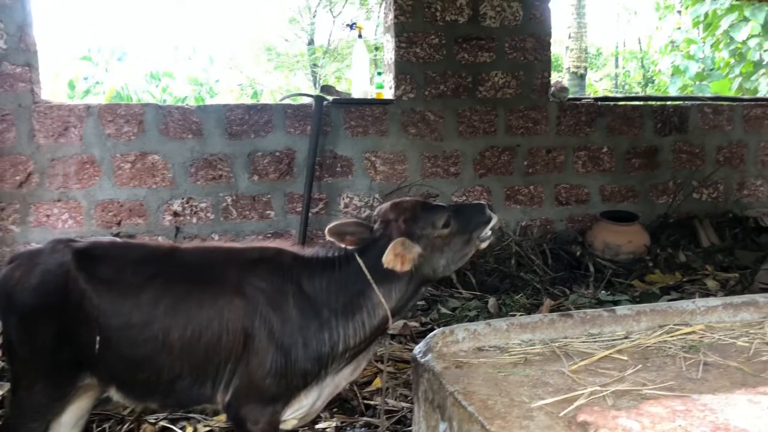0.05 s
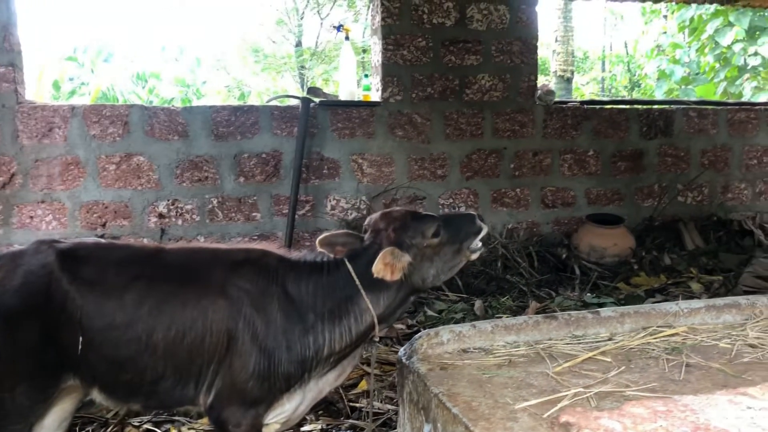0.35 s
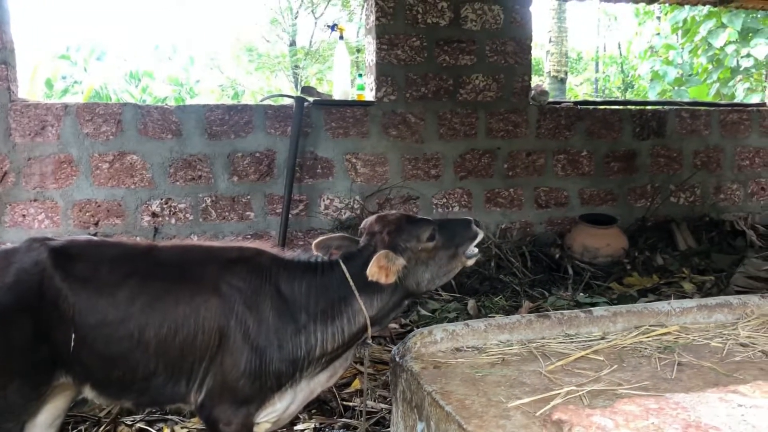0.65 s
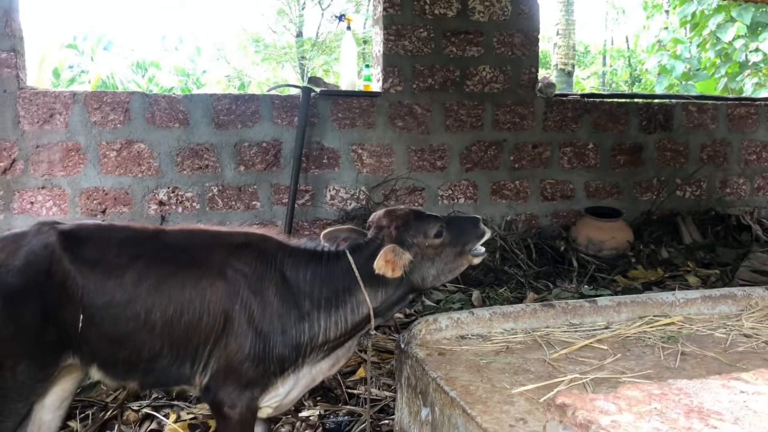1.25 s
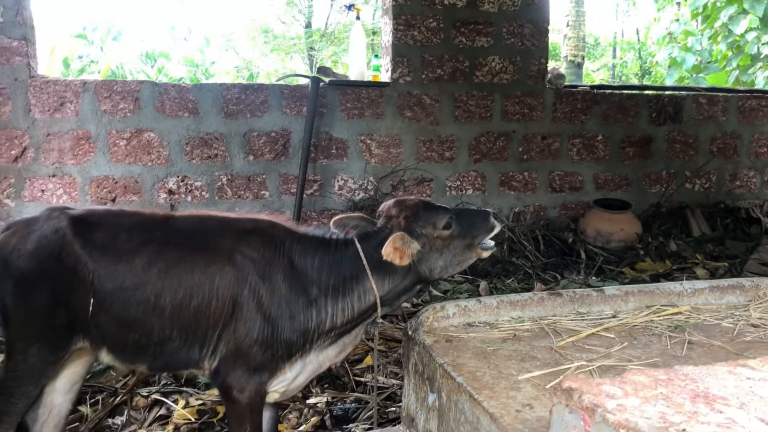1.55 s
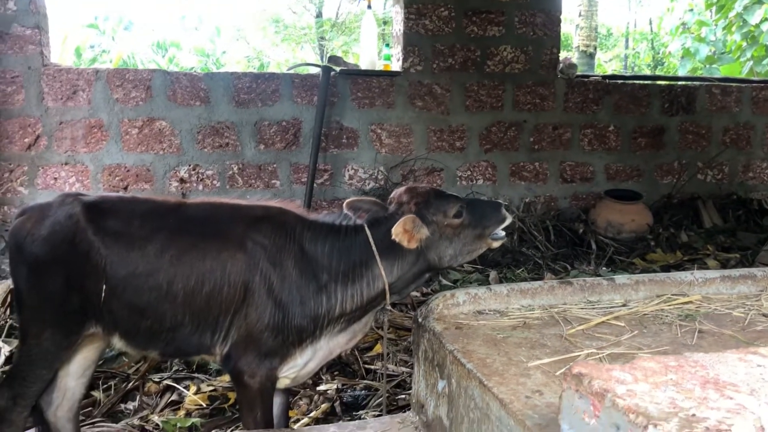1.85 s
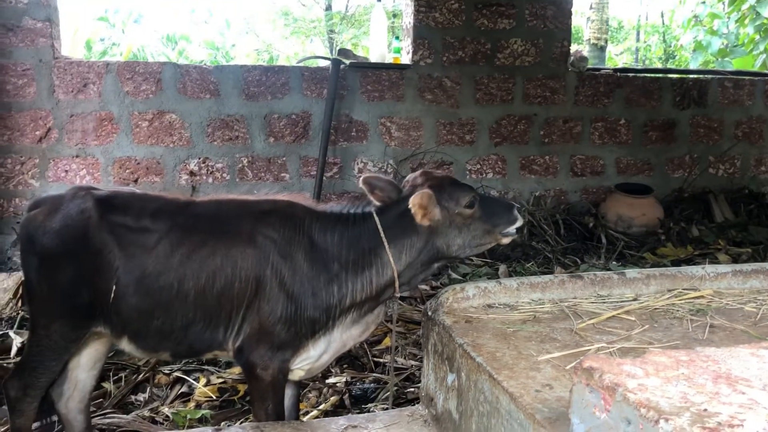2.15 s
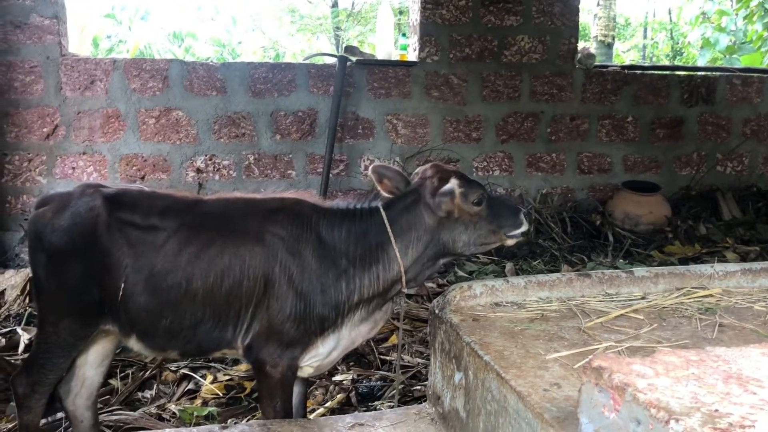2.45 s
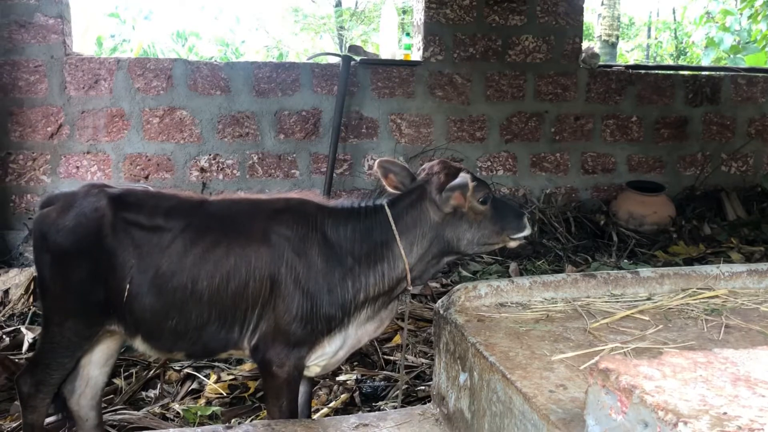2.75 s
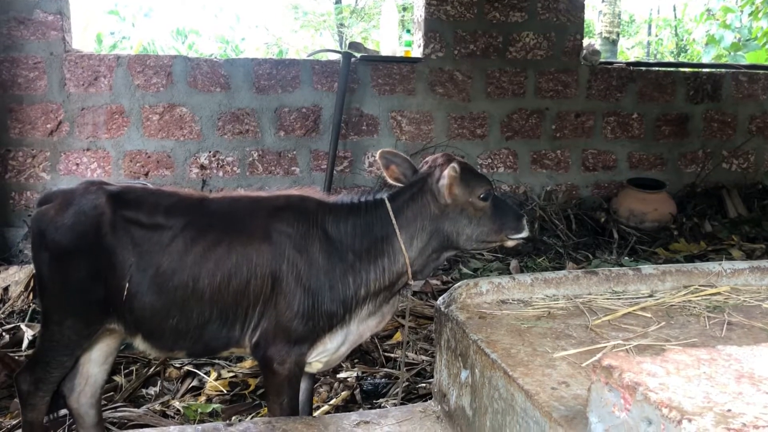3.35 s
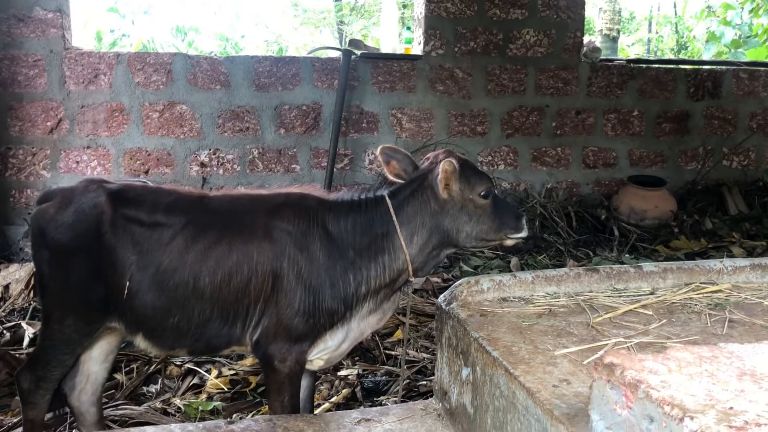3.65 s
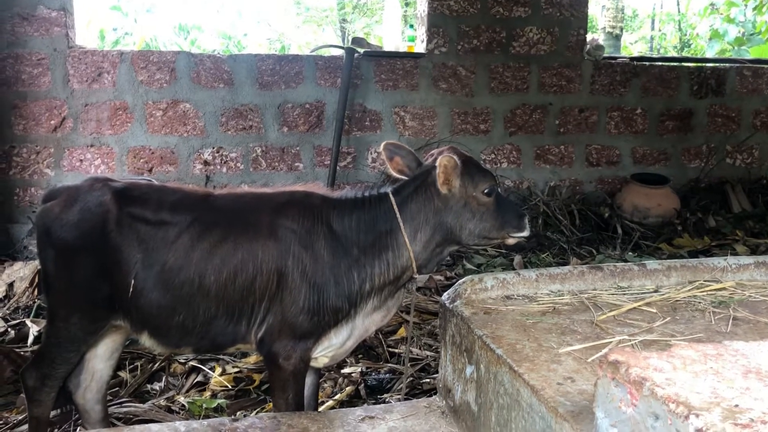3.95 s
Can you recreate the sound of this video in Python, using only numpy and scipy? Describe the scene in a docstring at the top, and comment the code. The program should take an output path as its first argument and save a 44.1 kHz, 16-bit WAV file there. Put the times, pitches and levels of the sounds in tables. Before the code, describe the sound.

A calf bawls loudly nearby in a shed, holding one steady note that cracks into a falling rasp. Afterwards it is quiet, with faint straw rustling, insects and distant birds.

```python
"""Calf bawling in a brick shed

A calf holds one long clean note while its mouth slowly closes, then breaks into a falling rasp.
By the source-filter principle, vocal-fold pulses set the pitch and the throat and mouth the colour;
irregular pulses make the rasp. The walls reverberate. Behind it the straw stirs (filtered noise),
birds whistle and coo (gliding tones), insects shrill (noise bands, tones) and a far motor hums."""
import sys
import numpy as np
from scipy import signal
from scipy.fft import rfft, irfft, next_fast_len
from scipy.io import wavfile
from scipy.ndimage import uniform_filter1d, map_coordinates

SR = 44100
rng = np.random.default_rng(int(sys.argv[2]) if len(sys.argv) > 2 else 0)


def int16_out(signal):
    """Quantize to a 16-bit WAV file."""
    q = np.round(np.clip(np.atleast_2d(signal).T, -1, 1) * 32767)
    wavfile.write(sys.argv[1], SR, q.astype(np.int16))


N = 176400
LEAD = 8192  # samples of filter lead-in

# fundamental of the vocal folds (t/s, f/Hz)
PITCH = [(0, 222.5), (.12, 225.6), (.24, 230), (.38, 229.8), (.6, 227.7), (.79, 226), (.94, 225.7),
         (1.14, 223.2), (1.21, 221.3), (1.42, 219), (1.5, 214.5), (1.525, 222), (1.615, 213), (1.655, 193),
         (1.7, 181), (1.745, 170), (1.8, 130), (1.85, 116)]
# irregularity of the folds (t/s, roughness 0-1)
ROUGHNESS = [(0, .013), (.15, .01), (1.15, .012), (1.49, .028), (1.53, .27), (1.63, .34), (1.68, .15),
             (1.73, .18), (1.78, .4), (1.85, .42)]
# envelopes of the note, its bright band, the rasp and the treble (t/s, relative level/dB)
NOTE_LEVEL = [(0.0, -20.5), (0.128, -22.5), (0.368, -21.5), (0.61, -25), (0.916, -26), (1.136, -24.5),
              (1.472, -27.5), (1.49, -31)]
BRIGHT_LEVEL = [(0.0, -21.5), (0.036, -32), (0.228, -32), (0.25, -35), (0.346, -31.5), (0.37, -36),
                (0.438, -31), (0.872, -35.5), (0.96, -36), (0.986, -41.5), (1.106, -46), (1.21, -38.5),
                (1.286, -38), (1.5, -41)]
RASP_LEVEL = [(1.5, -30), (1.548, -27), (1.642, -31.5), (1.656, -27.5), (1.736, -25.5), (1.792, -35.5),
              (1.808, -33), (1.87, -46)]
TREBLE_LEVEL = [(0.0, -41.5), (0.336, -47.5), (0.544, -45), (0.584, -47), (0.828, -43), (0.884, -46.5),
                (1.02, -49.5), (1.252, -51.5), (1.656, -58), (1.708, -48.5), (1.838, -63.5), (1.86, -53)]
# vocal tract response: mouth open, rounded, nearly shut; voice cracking, last push (f/Hz, gain/dB)
TRACT_OPEN = [(120, -40), (228, -10), (458, -4), (688, -3), (918, -7), (1147, 0), (1376, -9), (1605, -5),
              (1835, -5), (2064, -16), (2294, -9), (2523, -16), (2752, -8), (2980, -15), (3210, -16),
              (3440, -21), (3900, -32), (4600, -70)]
TRACT_ROUNDED = [(120, -42), (226, -13), (452, -12), (678, 0), (904, -10), (1130, -7), (1356, -22),
                 (1582, -10), (1808, -9), (2034, -20), (2260, -15), (2486, -25), (2712, -16), (2938, -10),
                 (3164, -23), (3390, -27), (3620, -23), (4500, -70)]
TRACT_SHUT = [(120, -63), (220, -9.5), (441, -4.5), (662, 2), (882, -9), (1103, -3.5), (1323, -10.5),
              (1544, -15), (1764, -11), (1985, -20.5), (2205, -20), (2426, -17), (2646, -23.5), (3087, -16),
              (3400, -30.5), (4400, -71.5)]
TRACT_CRACK = [(100, -29), (215, -10), (300, -29), (440, -5.5), (560, 4), (660, 0), (800, -11.5),
               (1100, -13), (1450, -17), (1800, -10.5), (2150, -28), (3100, -23.5), (3600, -32),
               (4500, -74.5)]
TRACT_PUSH = [(90, -6.5), (175, -9.5), (270, -8.5), (370, -13), (540, 4), (720, -10), (900, -12),
              (1080, -0.5), (1270, -6.5), (1500, -17), (1800, -8.5), (2200, -13), (2600, -16.5),
              (3200, -16), (3700, -29), (4600, -87)]
# spectra of the high overtones and of air in the throat (f/Hz, gain/dB)
TREBLE_COLOUR = [(3000, -43.5), (3700, 5.5), (4150, -0.5), (4550, 8), (5000, -1.5), (5400, -2.5),
                 (5800, -9), (6500, -6.5), (7100, -8), (8200, -6), (10000, -14), (11600, -17), (12600, -29),
                 (14000, -34), (15800, -31)]
BREATH_COLOUR = [(150, -32), (380, -45.5), (540, 8), (680, -12.5), (900, -7.5), (2500, -9), (5000, -38.5)]
# response of the shed's echo (f/Hz, gain/dB)
SHED_COLOUR = [(200, -20), (700, -18), (1500, -13), (2500, -8), (4000, -1), (8000, 3)]
# reverberation times of shed and yard (f/Hz, T60/s)
SHED_T60 = [(150, .16), (600, .17), (2500, .2), (10000, .16)]
YARD_T60 = [(500, 0.56), (4000, 0.68), (10000, 0.1)]
# stirrings of the straw (centre t/s, duration/s, level/dB)
RUSTLES = [(2.3, 0.38, -63.5), (2.575, 0.28, -61), (3.384, 0.2, -71)]
# spectrum of the straw (f/Hz, gain/dB)
RUSTLE_COLOUR = [(700, -22), (1350, -5.5), (1550, -8), (1850, 0), (2150, -7.5), (2600, -25), (5000, -19),
                 (7000, -60)]
# steps and snapping straw (t/s, f/Hz, resonator bandwidth/Hz, T60/s, level/dB)
IMPACTS = [(1.115, 450, 600, .15, -42), (2.078, 1000, 1500, .09, -57), (2.31, 13500, 1800, .04, -62)]
# bird whistles (onset t/s, relative level/dB)
WHISTLES = [(2.38, -68.5), (3.7, -61.5)]
# glide of one whistle (t/s from onset, f/Hz, relative level/dB)
WHISTLE_GLIDE = [(0, 5290, -23), (.015, 5210, -19), (.085, 4460, -10), (.11, 4065, -12), (.16, 3530, -3.5),
                 (.21, 2980, -1.5), (.28, 2960, -21), (.33, 2850, -30)]
# bird coos (centre t/s, duration/s, f/Hz, relative level/dB)
COOS = [(2, .08, 790, -68), (3, .1, 860, -72), (3.12, .2, 695, -69), (3.35, .1, 790, -72),
        (3.58, .12, 790, -70), (3.83, .1, 700, -72)]
# insect spectra: chorus, buzz and lower chirr (f/Hz, gain/dB)
CHORUS_COLOUR = [(8300, -28.5), (8800, 0), (9100, -5), (9700, -2.5), (10250, -1), (10900, -26.5),
                 (12000, -50.5)]
BUZZ_COLOUR = [(7000, -22), (7700, -10), (8150, -14), (8700, -35)]
CHIRR_COLOUR = [(2800, -30), (3100, 0), (3300, -2), (3600, -30)]
# nearest insects of the chorus (f/Hz, level/dB)
SINGERS = [(9100, -79.5), (9530, -84.5)]
# swells of the buzzing insect (centre t/s, duration/s, level/dB)
BUZZES = [(2.08, .36, -71.5), (2.95, .36, -73), (3.88, .5, -72)]
# swells of the chirring insect (centre t/s, duration/s)
CHIRRS = [(2.203, 0.42), (2.892, .22), (3.156, 0.081), (3.464, 0.14)]
# motor partials (f/Hz, initial level/dB, drift/Hz)
MOTOR_PARTIALS = [(101.5, -63, 5), (380.8, -60.5, .7), (347, -74.5, 5), (734, -72, 1.8)]
# spectrum of the outdoor air (f/Hz, gain/dB)
OUTDOOR_COLOUR = [(15, -47.5), (25, -15.5), (96, 1), (126, -14.5), (165, -6.5), (307, -14.5), (381, -7),
                  (413, -14.5), (555, -17.5), (789, -18), (1010, -21), (1350, -24.5), (2650, -28),
                  (3200, -28), (4090, -36.5), (6120, -37.5), (9170, -37.5), (11400, -40.5), (15700, -49)]
# envelope of the outdoor air (t/s, level/dB)
OUTDOOR_LEVEL = [(0, -57.5), (3.64, -55.5), (3.7, -58.5), (4, -59.5)]

ROUND_S, SHUT_S = (.42, .8), (1.1, 1.24)  # the mouth rounds, then nearly shuts
BREAK_S, PUSH_S, STOP_S = (1.49, 1.52), (1.61, 1.655), (1.83, 1.87)  # the voice cracks, pushes, ends


def calf(delay_s_per_hz=1.7e-6):
    """Source and filter: one pulse train drives note, rasp and treble; higher overtones arrive later."""
    source, air = vocal_folds()
    voice = crossfade(clean_note(source), rasp(source), BREAK_S)
    treble = steady(tract(source + .2 * air, TREBLE_COLOUR)) * amp(curve(TREBLE_LEVEL) - 4)
    bawl = (voice + treble) * (1 - fade(STOP_S))
    return filtered(bawl, lambda hz: np.exp(-1j * np.pi * delay_s_per_hz * hz * hz))


def vocal_folds(harmonics=90, waver=.0009, jitter=.08, shimmer=1.1):
    """Phonation: pulses modulate turbulence; roughness scatters their timing and size."""
    rough = curve(ROUGHNESS)
    cycles = np.cumsum(curve(PITCH) * (1 + waver * wobble(46.35))) / SR
    cycles += jitter * rough * wobble(260)
    offset = cycles - np.round(cycles)
    terms = 2 * harmonics + 1
    pulses = steady(terms * np.sinc(terms * offset) / np.sinc(offset) - 1)
    tripling = 1.7 * (1 - fade(PUSH_S)) * np.sin(2 * np.pi / 3 * cycles)  # stresses every third pulse
    sizes = 1 + rough * (tripling + shimmer * wobble(200))
    air = unit(rng.standard_normal(N) * (1 + .27 * np.cos(2 * np.pi * cycles)))
    return pulses * sizes + .5 * rough * air, air


def clean_note(source, crossover_hz=2400, breath_db=-27.5):
    """Formants shift as the mouth closes from a wide, resonant gape to nearly shut."""
    note = crossfade(tract(source, TRACT_OPEN), tract(source, TRACT_ROUNDED), ROUND_S)
    note = crossfade(note, tract(source, TRACT_SHUT), SHUT_S)
    gape = 2.85 * resonance(note, hz=967, width_hz=87)
    blare = .97 * resonance(note, hz=2400, width_hz=480)
    note = note + (gape + blare) * swell(0, .34)
    body = filtered(note, lambda hz: 1 / (1 + (hz / crossover_hz) ** 20))
    bright = steady(note - body) * amp(curve(BRIGHT_LEVEL) - 2)
    breath = amp(breath_db) * noise(BREATH_COLOUR)
    return (steady(body) + breath) * amp(curve(NOTE_LEVEL)) + bright


def rasp(source):
    """Irregular pulses excite the tract; a mouth resonance rings as the call ends."""
    voice = crossfade(tract(source, TRACT_CRACK), tract(source, TRACT_PUSH), PUSH_S)
    ring = 1.3 * swell(1.78, .12) * resonance(voice, hz=1120, width_hz=59)
    return steady(voice + ring) * amp(curve(RASP_LEVEL))


def tract(x, colour, size=4096):
    """The vocal tract as a minimum-phase filter, which rings only after each pulse."""
    cepstrum = irfft(np.log(amp(along(colour, np.fft.rfftfreq(size, 1 / SR)))))
    cepstrum[1:size // 2] *= 2
    cepstrum[size // 2 + 1:] = 0
    return convolved(x, irfft(np.exp(rfft(cepstrum))))


def shed(x, sway_s=.22):
    """Wall reflections interfere: overtones swell and drop out as the head sways."""
    shares = (np.sqrt(np.clip(1 - np.abs(clock() / sway_s - k), 0, 1)) for k in range(10))
    walls = sum(echo(x * share, SHED_T60) for share in shares)
    return filtered(walls, lambda hz: amp(along(SHED_COLOUR, hz)))


def straw():
    """Noise swells as the bedding rustles; steps and snaps decay exponentially."""
    t = clock()
    bedding = noise(RUSTLE_COLOUR) * swells(RUSTLES)
    for onset, hz, width, t60, db in IMPACTS:
        ring = unit(resonance(resonance(rng.standard_normal(N), hz, width), hz, width))
        bedding += ring * (t >= onset) * amp(db - 60 * np.abs(t - onset) / t60)
    return bedding


def birds(quaver=.025, coo_fall_hz_per_s=290):
    """Falling whistles and coos from afar, where the yard's reverberation outweighs the direct sound."""
    t = clock()
    times, pitch, level = np.transpose(WHISTLE_GLIDE)
    tone = lambda hz: unit(sine(hz * (1 + quaver * wobble(350))))
    song = np.zeros(N)
    for onset, db in WHISTLES:
        envelope = amp(db + np.interp(t - onset, times, level, -120, -120))
        song += tone(np.interp(t - onset, times, pitch)) * envelope
    for centre, length, hz, db in COOS:
        fall = coo_fall_hz_per_s * np.clip(t - centre, -length, length)
        song += tone(hz - fall) * amp(db) * swell(centre, length)
    return song / 2 + echo(song, YARD_T60)


def insects(chorus_db=-70, chirr_db=-72.5):
    """Many voices merge into band noise; two near singers, a buzz and a chirr are superposed."""
    chorus = amp(chorus_db + wobble(20)) * noise(CHORUS_COLOUR)
    for hz, db in SINGERS:
        singer = sine(hz + 60 * wobble(11) + 50 * wobble(300))
        chorus += amp(db) * unit(singer * amp(3.9 * wobble(11)))
    buzz = swells(BUZZES) * noise(BUZZ_COLOUR)
    chirr = amp(chirr_db) * sum(swell(*row) for row in CHIRRS) * noise(CHIRR_COLOUR)
    return chorus + buzz + chirr


def motor(flutter_db=1.1):
    """A far hum whose partials are randomly modulated in frequency and amplitude."""
    return sum(amp(db) * unit(sine(hz + drift * wobble(25)) * amp(flutter_db * wobble(16)))
               for hz, db, drift in MOTOR_PARTIALS)


def outdoors():
    """Ambient sound: broadband air and the motor share one envelope."""
    level = amp(curve(OUTDOOR_LEVEL))
    return level * noise(OUTDOOR_COLOUR) + motor() * level / level[0]


def amp(db):
    """Decibels to amplitude ratio."""
    return 10 ** (np.asarray(db) / 20)


def unit(x):
    """Normalisation to rms 1."""
    return x / np.sqrt(np.mean(x ** 2) + 1e-20)


def steady(x, size=1400):
    """Normalisation to a running rms of 1."""
    power = uniform_filter1d(uniform_filter1d(x * x, size), size)
    return x / np.sqrt(np.abs(power) + 1e-12)


def clock():
    """Sample times in seconds."""
    return np.arange(N) / SR


def curve(rows):
    """Linear interpolation of (t/s, value) rows."""
    return np.interp(clock(), *np.transpose(rows))


def along(rows, hz):
    """Interpolation of (f/Hz, value) rows in log frequency."""
    f, values = np.transpose(rows)
    return np.interp(np.log(hz + 1), np.log(f + 1), values)


def fade(span_s):
    """Linear ramp from 0 to 1."""
    return np.interp(clock(), span_s, [0, 1])


def crossfade(a, b, span_s):
    """Linear transition from a to b."""
    return a + (b - a) * fade(span_s)


def swell(centre_s, length_s):
    """Gaussian envelope, length_s wide at 1/e."""
    return np.exp(-(2 * (clock() - centre_s) / length_s) ** 2)


def swells(rows):
    """Sum of Gaussian envelopes."""
    return sum(amp(db) * swell(centre, length) for centre, length, db in rows)


def wobble(rate):
    """Smooth random modulation, rate knots a second."""
    return map_coordinates(rng.standard_normal(int(N * rate / SR) + 4), [clock() * rate])


def sine(hz):
    """Oscillator whose phase integrates frequency."""
    return np.sin(2 * np.pi * np.cumsum(hz) / SR)


def noise(colour):
    """Coloured noise of rms 1."""
    return unit(filtered(rng.standard_normal(N), lambda hz: amp(along(colour, hz))))


def lead_in(x):
    """Mirrored lead-in, so that filters already ring at the start."""
    return np.pad(x, (LEAD, 0), mode="reflect")


def filtered(x, response):
    """Multiplication of the spectrum by a frequency response."""
    size = next_fast_len(N + SR // 2)
    spectrum = rfft(lead_in(x), size) * response(np.fft.rfftfreq(size, 1 / SR))
    return irfft(spectrum, size)[LEAD:LEAD + N]


def convolved(x, impulse):
    """Convolution with an impulse response."""
    return signal.fftconvolve(lead_in(x), impulse)[LEAD:LEAD + N]


def resonance(x, hz, width_hz):
    """Response of a damped oscillator driven by x."""
    return filtered(x, lambda f: 1j * f * width_hz / (hz * hz - f * f + 1j * f * width_hz))


def echo(x, t60s):
    """Diffuse reverberation: each frequency decays at its own rate."""
    hz, t, spectra = signal.stft(rng.standard_normal(SR // 2), SR, nperseg=256)
    decay = amp(-60 * t / along(t60s, hz)[:, None])
    tail = signal.istft(spectra * decay, SR, nperseg=256)[1]
    return convolved(x, tail / np.linalg.norm(tail))


def scene():
    """Superposition of the calf, its shed and the farm outside."""
    bawl = calf()
    return (bawl + shed(bawl) + straw() + birds() + insects() + outdoors())[None]


def record(dry):
    """Band limiting removes the deepest bass and the highest treble."""
    low_hz, top_hz = 33, 15800
    passband = lambda hz: (hz < top_hz) * (1 - 1 / (1 + (hz / low_hz) ** 6))
    return filtered(dry[0] * fade((0, .002)), passband)[None]


dry = scene()
out = record(dry)
int16_out(out)
```